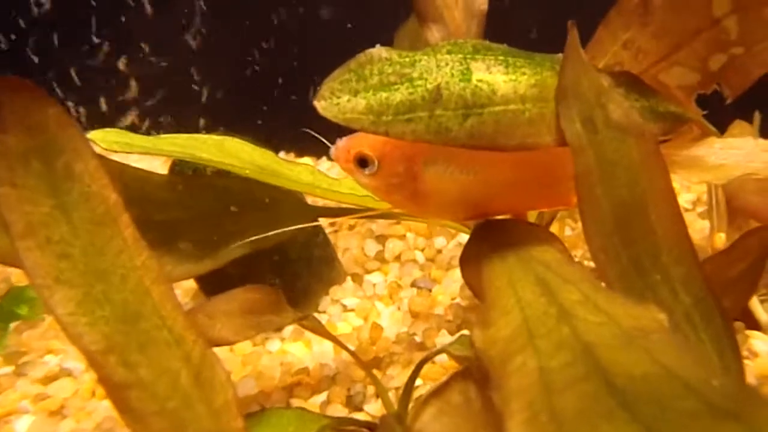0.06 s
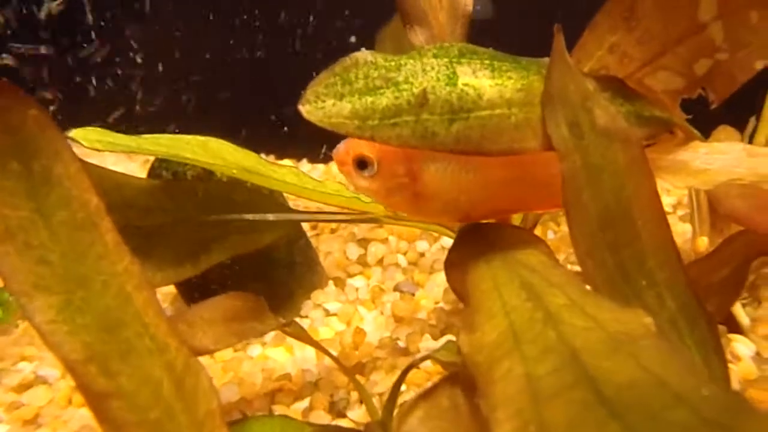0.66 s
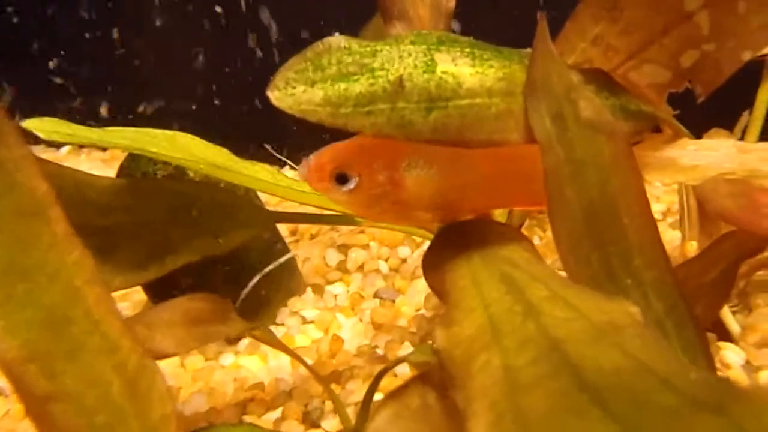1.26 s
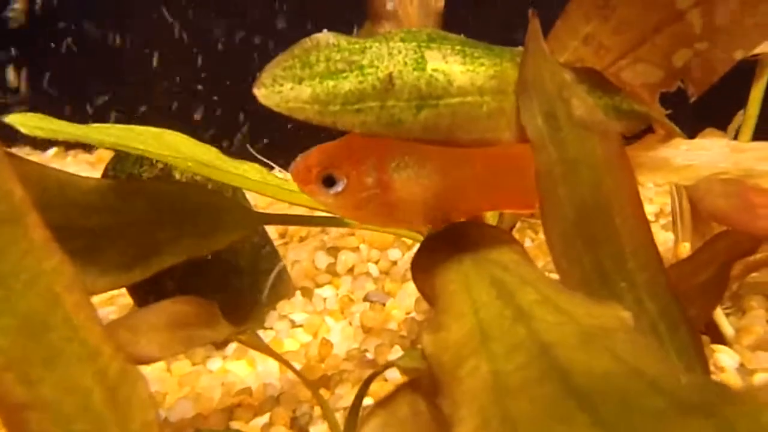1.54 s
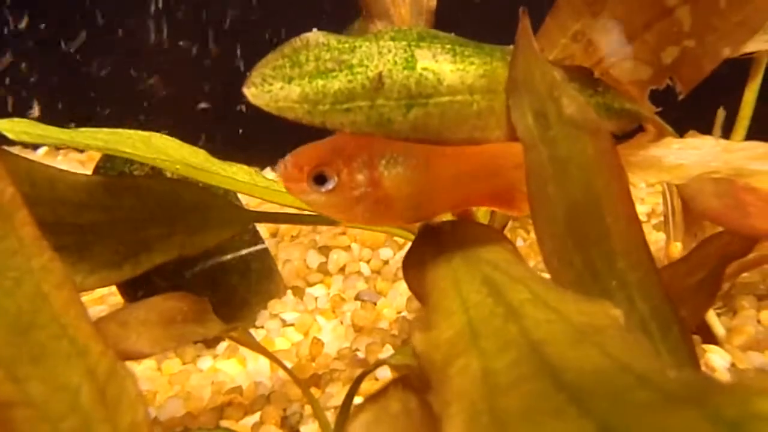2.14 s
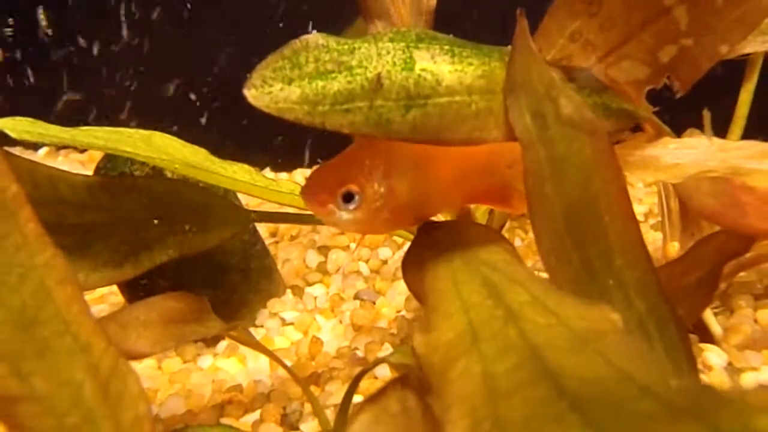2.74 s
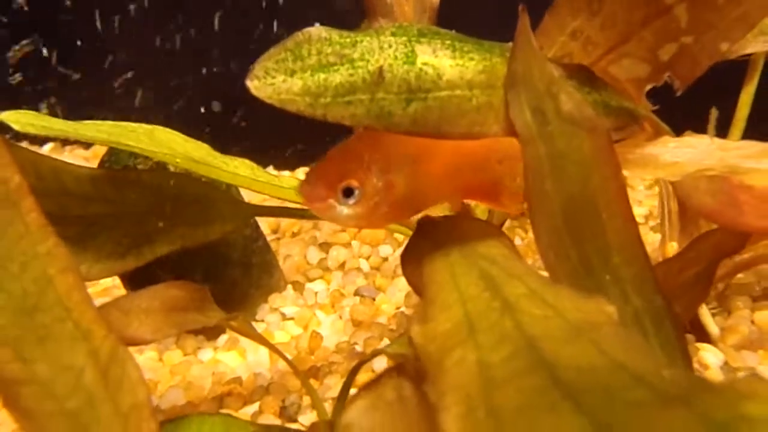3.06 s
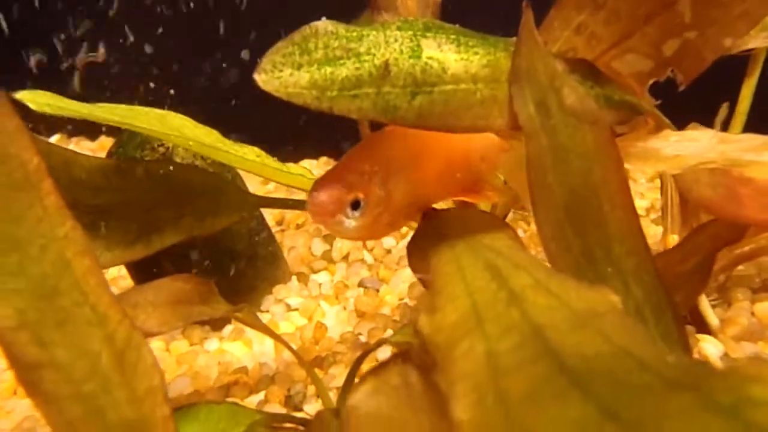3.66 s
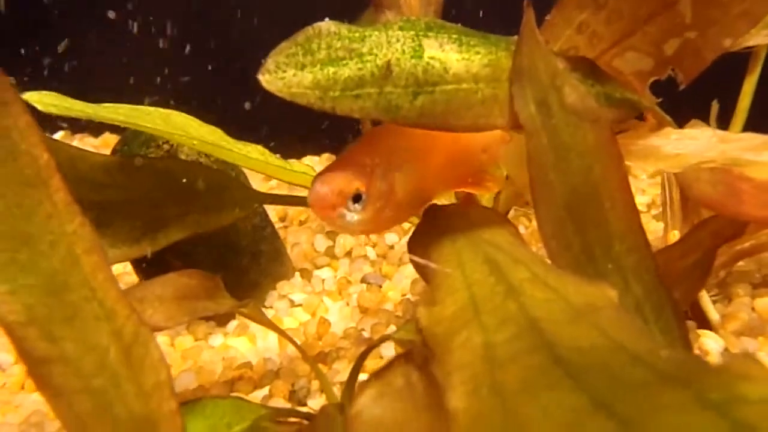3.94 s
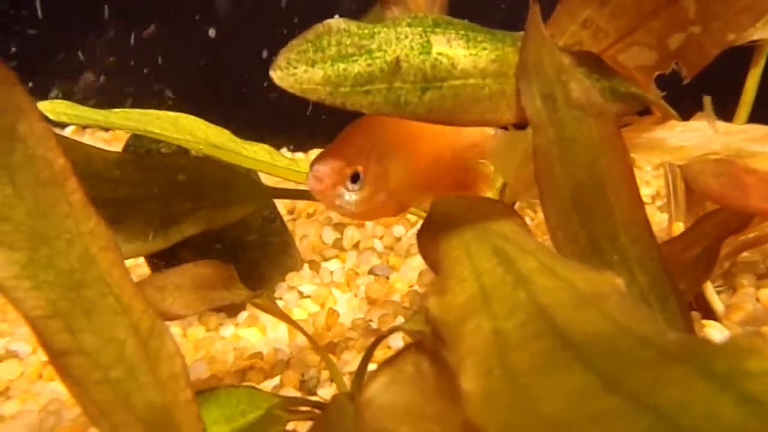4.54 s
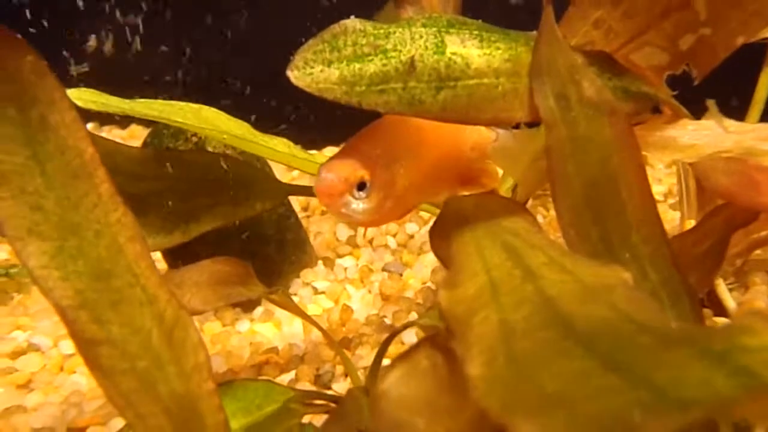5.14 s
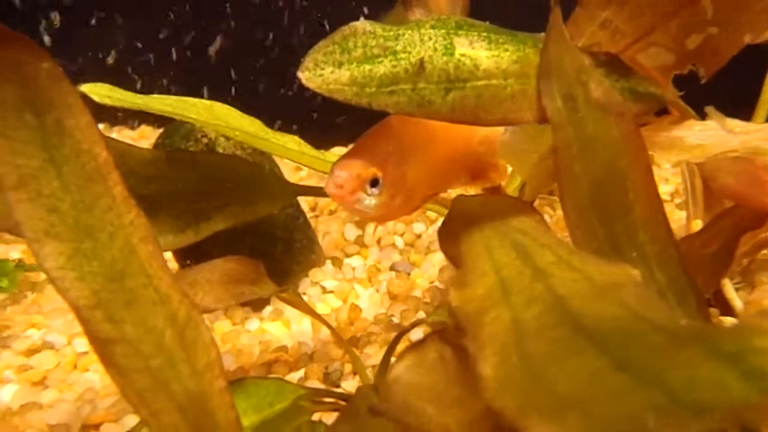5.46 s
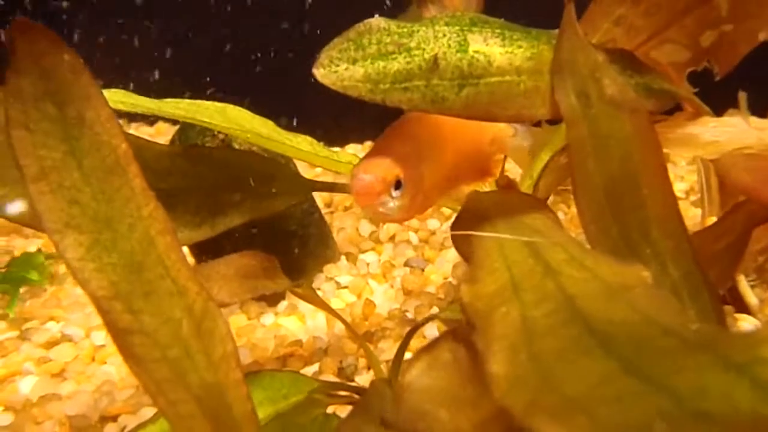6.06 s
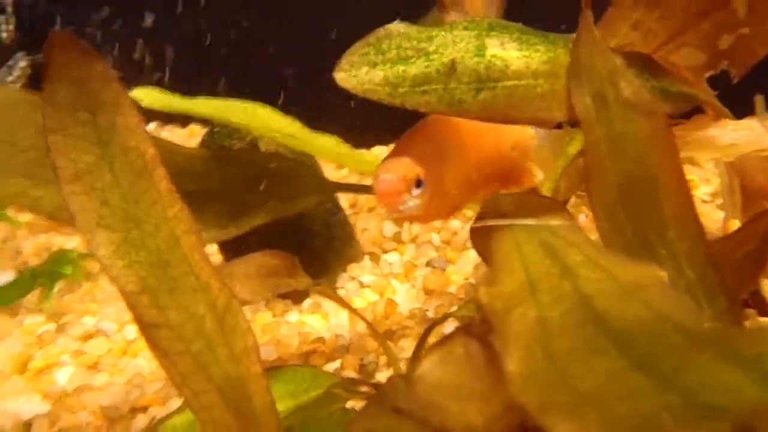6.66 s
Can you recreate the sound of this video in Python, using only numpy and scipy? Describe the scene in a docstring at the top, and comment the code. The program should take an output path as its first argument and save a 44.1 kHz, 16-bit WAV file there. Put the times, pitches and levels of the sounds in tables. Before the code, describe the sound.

Close, irregular bubbling and gurgling of water in a fish tank, with an air pump humming steadily underneath.

```python
"""Bubbles plop and babble over the hum of an air pump: an aquarium, heard close to the glass.
Each plop rings at its own pitch and sets the tank and the air pocket under its lid ringing.
Around the plops churn small bubbles, low gulps of air, a wash of water and a fine fizz.
The pump hums at twice the mains frequency; faint dry ticks and a thin electrical whine lie on top.
Gain control ducks everything after the loud plops."""
import sys
import numpy as np
from scipy import signal
from scipy.fft import rfft, irfft
from scipy.io import wavfile
from scipy.ndimage import uniform_filter1d

SR = 44100
rng = np.random.default_rng(int(sys.argv[2]) if len(sys.argv) > 2 else 0)


def persist_wave(psi):
    """Save psi, clipped to +-1, as 16-bit WAV."""
    counts = np.round(np.clip(psi, -1, 1) * 32767).astype(np.int16)
    wavfile.write(sys.argv[1], SR, np.atleast_2d(counts).T)


N = 299439
TIME = np.arange(N) / SR
LEAD_S = .006
AGE = np.arange(SR // 5) / SR - LEAD_S  # clock of every short sound, starting just ahead of its onset

# the clearest bubbles: t/s, level/dB, f/Hz, t60/s, swell/s, push on the tank/dB, click/dB
PLOPS = [(0.0107, -25, 764.0, 0.062, 0.0003, -49, -42), (0.0393, -24.5, 830, 0.023, 0.00042, -20.5, -33),
         (0.1096, -29, 872, 0.066, 0.00028, -18.5, -62), (0.224, -26.0, 700, 0.05, 0.00079, -39, -38),
         (0.2849, -54, 1190, 0.22, 0.00035, -25.5, -36), (0.3048, -25.5, 700, 0.03, 0.0005, -44, -42),
         (0.3956, -14.5, 651, 0.2, 0.0021, -9.5, -9.5), (0.4578, -17, 652, 0.087, 0.0016, -21.5, -27),
         (0.7264, -21, 777, 0.035, 0.0011, -45, -40), (0.7705, -22.5, 784, 0.097, 0.0014, -54, -43.0),
         (0.8073, -31, 764.0, 0.05, 0.0012, -40, -47), (0.8748, -13.5, 783, 0.015, 0.0011, -22.5, -33),
         (1.0728, -29, 786.0, 0.054, 0.00075, -48, -44), (1.162, -26, 794, 0.096, 0.00092, -42.0, -50.5),
         (1.1734, -24, 773, 0.071, 0.0019, -43, -47), (1.2418, -10, 778, 0.095, 0.0015, -52, -14),
         (1.351, -17, 780, 0.072, 0.00047, -35, -29.5), (1.3765, -24.5, 805, 0.22, 0.0003, -52, -55.0),
         (1.394, -28.5, 796, 0.074, 0.00081, -41, -49), (1.4835, -20.5, 790, 0.11, 0.0007, -37, -29.0),
         (1.5402, -6, 785, 0.076, 0.00078, -55, -9), (1.5999, -31, 844, 0.081, 0.0029, -20.5, -34),
         (1.6996, -31, 658, 0.023, 0.0008, -25, -33), (1.7821, -34, 1094, 0.1, 0.0029, -15.5, -34),
         (1.8421, -31.5, 802, 0.54, 0.0014, -29, -49), (1.8956, -32.5, 785, 0.074, 0.0027, -30, -42),
         (1.9308, -32, 852, 0.22, 0.0025, -15.5, -43), (1.9628, -23.5, 769, 0.14, 0.00082, -17.5, -36.0),
         (1.9916, -16.5, 780, 0.042, 0.00087, -35, -33), (2.1326, -37, 1108, 0.13, 0.0032, -14.5, -40),
         (2.2237, -23, 766, 0.088, 0.0022, -19, -31), (2.3312, -18, 768.0, 0.12, 0.00064, -31, -30),
         (2.3629, -31, 773, 0.086, 0.00062, -44, -38), (2.3999, -23.0, 779, 0.21, 0.0013, -44, -45),
         (2.4274, -24, 800, 0.058, 0.00058, -39.0, -44), (2.4605, -22.5, 793, 0.13, 0.0036, -32, -70),
         (2.5064, -15.5, 766, 0.08, 0.00042, -47, -33), (2.5476, -29.0, 994.0, 0.057, 0.00047, -19, -63),
         (2.584, -29, 734, 0.19, 0.00032, -34, -31), (2.6427, -27, 746, 0.057, 0.00057, -33, -39),
         (2.6532, -36, 1070, 0.081, 0.0015, -19.5, -41), (2.7012, -32.5, 786, 0.024, 0.0031, -24, -43),
         (2.7836, -23.0, 755, 0.23, 0.00045, -49, -45), (2.7998, -19.5, 848, 0.1, 0.0014, -17.5, -46),
         (2.8605, -21, 850, 0.045, 0.0016, -45, -50.0), (2.8725, -12.5, 794, 0.084, 0.00092, -30, -31),
         (2.8734, -24.5, 930, 0.14, 0.0011, -40, -50), (2.9069, -19, 815, 0.11, 0.00043, -26, -43),
         (2.9423, -25, 853, 0.05, 0.0008, -22.5, -53), (2.9947, -17, 962, 0.03, 0.0011, -13.5, -68),
         (3.0204, -26, 765, 0.04, 0.0024, -23.5, -46.0), (3.065, -29, 763, 0.08, 0.0008, -39, -44),
         (3.0835, -43, 920, 0.063, 0.00058, -24, -37), (3.2162, -41, 1052.0, 0.23, 0.001, -20, -46),
         (3.2887, -30, 886, 0.074, 0.00035, -26, -32), (3.3304, -46, 790, 0.24, 0.00034, -23.5, -40),
         (3.3884, -30, 590, 0.021, 0.00069, -26.5, -38), (3.4501, -36, 1040, 0.097, 0.001, -25, -37),
         (3.4799, -40, 750, 0.042, 0.00083, -39.0, -41), (3.4989, -33, 774, 0.041, 0.00053, -36, -44),
         (3.5475, -20, 795, 0.04, 0.00063, -30.0, -42), (3.5567, -19, 839, 0.092, 0.0012, -14.0, -23.5),
         (3.5891, -19.5, 793, 0.056, 0.00055, -23.5, -46.0), (3.6163, -16, 784, 0.11, 0.0013, -20, -64),
         (3.638, -25.5, 649, 0.43, 0.0026, -24, -44), (3.6628, -16, 824, 0.14, 0.0011, -11, -19.5),
         (3.6823, -25, 660, 0.22, 0.0038, -34, -50), (3.722, -27.5, 651, 0.15, 0.0017, -44, -50.0),
         (3.766, -29.5, 695, 0.089, 0.0018, -44, -46), (3.8385, -18.5, 670, 0.098, 0.00031, -24, -35),
         (3.9026, -27.5, 676, 0.072, 0.0009, -32, -48), (3.9267, -25, 673, 0.12, 0.00058, -26, -57),
         (3.993, -31, 666, 0.055, 0.0019, -49, -48.0), (4.0267, -15, 737, 0.023, 0.00077, -38, -38),
         (4.0616, -29, 750, 0.05, 0.00077, -33, -37), (4.0752, -16, 772, 0.041, 0.00094, -36, -29),
         (4.1257, -16.5, 810, 0.081, 0.0019, -25, -44), (4.2023, -22.5, 870, 0.049, 0.0012, -11, -31),
         (4.2212, -31, 802, 0.04, 0.00079, -45, -39.0), (4.2514, -33, 910, 0.036, 0.00053, -24.5, -57),
         (4.278, -28, 1050, 0.076, 0.0011, -14.5, -45), (4.3593, -27, 1023, 0.049, 0.00075, -22, -55),
         (4.3781, -31, 700, 0.042, 0.00094, -36, -54), (4.4151, -26.5, 690, 0.1, 0.00043, -41, -47),
         (4.4423, -21, 900, 0.02, 0.00078, -14.5, -17.5), (4.4922, -24.5, 770, 0.043, 0.00092, -42, -45),
         (4.5529, -12, 783, 0.036, 0.00038, -15, -11), (4.699, -17.5, 750, 0.018, 0.00053, -49, -35),
         (4.7329, -34, 735, 0.036, 0.00078, -41, -38), (4.7472, -37.5, 781, 0.38, 0.00044, -26, -34),
         (4.7808, -30, 760, 0.086, 0.0012, -41, -38), (4.8793, -33, 780, 0.05, 0.0009, -39.0, -31),
         (4.9374, -24.5, 770, 0.04, 0.00042, -32, -43), (4.9515, -24.5, 930, 0.06, 0.00041, -19, -28),
         (5.1028, -23.5, 714, 0.05, 0.0014, -42, -39), (5.2291, -29, 750, 0.048, 0.001, -40, -35),
         (5.257, -30, 717, 0.082, 0.0009, -33, -38), (5.3122, -24, 754, 0.085, 0.00068, -41, -41),
         (5.3227, -30, 725, 0.025, 0.0023, -28, -41), (5.5309, -25, 700, 0.015, 0.00057, -41, -44),
         (5.598, -21, 675, 0.038, 0.00044, -55, -48), (5.6381, -11.5, 795, 0.016, 0.00087, -17.5, -14.5),
         (5.7014, -20, 667, 0.058, 0.00046, -36, -33), (5.7768, -27, 750, 0.044, 0.00079, -37, -36),
         (5.9153, -28.5, 795, 0.26, 0.0013, -35, -41), (6.0722, -26.0, 778, 0.07, 0.00058, -37, -45),
         (6.1017, -21, 771, 0.071, 0.0014, -48, -71), (6.2501, -31, 745, 0.058, 0.00064, -39, -43),
         (6.265, -21.5, 840, 0.072, 0.0021, -13.5, -20.5), (6.2812, -33, 695, 0.064, 0.0013, -43.5, -35),
         (6.3278, -33, 668, 0.1, 0.0004, -24, -31.5), (6.3457, -7.5, 767, 0.084, 0.0012, -35, -16.5),
         (6.3973, -21.5, 784, 0.054, 0.0023, -23.5, -33), (6.5708, -28.5, 785, 0.029, 0.0007, -44, -38),
         (6.6048, -20.5, 800, 0.042, 0.0015, -48, -44)]
# pitch of the air pocket under the lid, wandering as it grows and shrinks: t/s, f/Hz
POCKET_PITCH = [(0, 734), (.4, 751), (.55, 696), (.8, 769), (1.05, 759), (1.4, 778), (1.7, 729), (2.2, 762),
                (2.65, 735), (3.0, 746.5), (3.2, 732), (3.6, 741), (3.88, 799), (4.05, 751), (4.2, 749.6),
                (4.35, 724), (4.85, 766), (5.1, 708), (5.35, 740), (5.65, 662), (5.95, 789), (6.27, 744),
                (6.5, 781)]


def plops(bubble_db=-0.35, tank_db=-0.1, click_trim_db=-2.0):
    """Each bubble swells and rings at its own pitch and pushes the tank; a click rides on its first crests."""
    out, pushes = np.zeros(N), np.zeros(N)
    for s, db, hz, t60, swell_s, push_db, click_db in PLOPS:
        tone = gain_of(db + bubble_db) * ring(hz, t60, swell_s)
        add(out, s, tone + gain_of(click_trim_db) * click(click_db, hz, t60))
        pushes[round(s * SR)] += gain_of(push_db + tank_db)
    return out + tank(pushes)


def click(db, hz, t60, soft_db=-34, hard_db=-15, dull_hz=380, bright_hz=690, spike_s=.00005):
    """Sharp clicks ride on the first crests of the loudest plops, brighter when harder, repeated on the first
    swings."""
    hardness = np.clip((db - soft_db) / (hard_db - soft_db), 0, 1)
    tone_hz = dull_hz + (bright_hz - dull_hz) * hardness
    peak = (1 / (1 - 2j * np.pi * tone_hz * AGE) ** 2).real
    swings_s = np.arange(4) / hz  # the first crests of the plop's tone
    spikes = sum(gain_of(-200 * s / t60) * np.exp(-abs(AGE - s) / spike_s) for s in swings_s)
    high_ring = ring(hz=2600, t60=0.13 * t60, rise_s=0.00018)
    return gain_of(db) * (peak + hardness * (gain_of(-13) * spikes + gain_of(-32) * high_ring))


def tank(pushes):
    """The glass box and the air pocket under its lid ring when pushed; the pocket's pitch wanders."""
    # modes of the glass box: f/Hz, level/dB, t60/s
    glass_modes = [(655, -21.5, 0.071), (826, -30.5, 0.099), (911, -23.5, 0.19), (437, -19.5, 0.015),
                   (301, -16, 0.072)]
    # the air pocket's quick ring and lingering tail: level/dB, t60/s
    pocket_decays = [(-2.5, 0.069), (-21.5, 0.2)]
    glide = np.exp(2j * np.pi * np.cumsum(follow(POCKET_PITCH)) / SR)
    fade = sum(gain_of(db) * ring(0, t60, rise_s=0.001) for db, t60 in pocket_decays)
    glass = sum(gain_of(db) * ring(hz, t60, rise_s=0.0012) for hz, db, t60 in glass_modes)
    on_time = slice(round(LEAD_S * SR), round(LEAD_S * SR) + N)
    pocket = (glide * signal.oaconvolve(pushes / glide, fade)[on_time]).real
    return pocket + signal.oaconvolve(pushes, glass)[on_time]


def pings(level_db=-3, cycles=66, within_s=0.0092, scatter_hz=130, spread_db=10, count=3):
    """A small bubble rings high, too light to move the tank, and splits into a few of similar pitch."""
    # small bubbles that stand out on their own: t/s, level/dB, f/Hz
    clear_pings = [(0.0313, -35, 1740), (0.3062, -35, 1170), (0.532, -49, 1690), (.604, -41.5, 1390),
                   (.657, -43.5, 1180), (0.703, -37.5, 1237), (1.026, -48, 1290), (1.359, -38, 1160),
                   (1.397, -35, 1176), (1.485, -32, 1143), (1.7747, -43.5, 4030), (1.81, -46, 1560),
                   (1.894, -40, 1360), (2.056, -41, 1430), (2.136, -41, 1570), (2.223, -43, 1560),
                   (2.296, -49.5, 1937), (2.365, -34.5, 1050), (3.084, -39, 1400), (3.233, -51.5, 3840),
                   (3.242, -35, 1180), (3.387, -43, 1530), (3.476, -44, 1100), (4.19, -56, 4000),
                   (4.207, -32, 1147), (4.209, -40, 1375), (4.695, -48.5, 1780), (4.748, -37.5, 1384),
                   (4.816, -52, 1220), (4.856, -40, 1180), (4.889, -43, 1378), (4.938, -43, 1400),
                   (5.037, -42, 1395), (5.099, -40.5, 1390), (5.102, -45, 1660), (5.177, -36.5, 1170),
                   (5.178, -45, 1426), (5.419, -57, 2380), (5.462, -38, 1087), (5.485, -47, 1550),
                   (5.533, -42, 1410), (5.598, -34.5, 1160), (5.778, -51, 1490), (5.938, -45.5, 1770),
                   (5.969, -39, 1120), (6.33, -50, 2480), (6.392, -34.5, 1310), (6.661, -54, 2454),
                   (6.721, -42, 1150)]
    out = np.zeros(N)
    for (s, db, hz), draws in zip(clear_pings, rng.random((len(clear_pings), count, 3))):
        t60 = cycles / hz
        add(out, s, gain_of(db + level_db) * ring(hz, t60))
        for delay, detune, weakness in draws:
            splinter = ring(hz + scatter_hz * (2 * detune - 1), t60 / 2)
            add(out, s + within_s * delay, gain_of(db + level_db - spread_db * weakness) * splinter)
    return echoes(out, level_db=-9.0, t60=0.059)


def shed_bubbles(below_db=17, spread_db=9, low_hz=890, high_hz=1450, db_per_octave=-15, within_s=0.021):
    """Each large bubble sheds six smaller ones, which ring higher along with it."""
    out = np.zeros(N)
    for (s, db, _, _, _, push_db, _), draws in zip(PLOPS, rng.random((len(PLOPS), 6, 3))):
        parent_db = min(max(db, push_db), -22)
        for delay, pitch, weakness in draws:
            hz = low_hz * (high_hz / low_hz) ** pitch
            level_db = parent_db - below_db + db_per_octave * np.log2(hz / low_hz) - spread_db * weakness
            add(out, s + within_s * delay, gain_of(level_db) * ring(hz, t60=0.018))
    return echoes(out, level_db=-20.5, t60=0.055)


def churn(swell_depth=0.79):
    """Soft plops near the air pocket's pitch and a babble of smaller bubbles swell with the air stream."""
    # swells of the air stream, each taken about its mean: t/s, soft plops/dB, high bubbles/dB
    air_stream = [(0.0, -42.5, -64.5), (0.62, -45, -57.5), (1.0, -40.5, -79), (1.321, -40, -58),
                  (2.7, -39.5, -62.5), (3.57, -32.5, -67.5), (3.84, -51, -62.5), (4.369, -38.5, -66),
                  (4.88, -36, -53), (5.13, -48, -66.5), (5.45, -38, -63), (5.94, -49, -60.5),
                  (6.18, -33.5, -66), (6.79, -36.5, -58)]
    soft = swarm(per_s=26, low_hz=.975 * follow(POCKET_PITCH), octaves=.11, level_db=-28.5,
                 spread_db=8.5, db_per_octave=4.5, cycles=57, tank_share=0.16)
    small = swarm(per_s=70, low_hz=849, octaves=.52, level_db=-42.5,
                  spread_db=14.5, db_per_octave=-17, cycles=92, tank_share=0.18)
    smaller = swarm(per_s=120, low_hz=1092, octaves=.7, level_db=-47,
                    spread_db=19, db_per_octave=-13.5, cycles=29, tank_share=0.6)
    tiny = swarm(per_s=25, low_hz=1700, octaves=1.5, level_db=-62,
                 spread_db=9, db_per_octave=-3, cycles=35, tank_share=0)
    low = soft + echoes(small, level_db=-7.5, t60=0.063)
    high = echoes(smaller + tiny, level_db=-0.5, t60=0.047)
    s, low_db, high_db = np.transpose(air_stream)
    low_swell = gain_of(swell_depth * np.interp(TIME, s, low_db - low_db.mean()))
    high_swell = gain_of(swell_depth * np.interp(TIME, s, high_db - high_db.mean()))
    return low_swell * low + high_swell * high


def swarm(per_s, low_hz, octaves, level_db, spread_db, db_per_octave, cycles, tank_share):
    """Loosely spaced bubbles ring from low_hz (steady or moving) upwards; higher ones die sooner."""
    out, pushes = np.zeros(N), np.zeros(N)
    lowest_hz = low_hz * np.ones(N)
    for k, (late, pitch, weakness, sustain) in enumerate(rng.random((int(per_s * N / SR), 4))):
        s = (k + late) / per_s
        hz = lowest_hz[int(s * SR)] * 2 ** (octaves * pitch)
        height = gain_of(level_db + db_per_octave * octaves * pitch - spread_db * np.sqrt(weakness))
        t60 = cycles / hz * (.5 + sustain)
        add(out, s, height * ring(hz, t60, rise_s=1 / hz, size=int((LEAD_S + t60) * SR)))
        pushes[int(s * SR)] += height * tank_share
    return out + tank(pushes) if tank_share else out


def gulps(level_db=-1, delay_s=0.00354):
    """Large pockets of air break from the outlet with a short low knock."""
    # heavy gulps that shake the water: t/s, level/dB, f/Hz, t60/s
    knocks = [(0.048, -21, 147, 0.031), (0.101, -13.5, 333, 0.0077), (.233, -16.5, 436, 0.011),
              (0.577, -23, 287, 0.028), (.698, -21, 314, 0.02), (1.153, -26, 151, 0.03),
              (1.238, -17.5, 465, 0.017), (1.35, -28, 151, 0.026), (1.646, -14, 337, 0.0047),
              (1.777, -17, 287, .021), (2.146, -23, 291, .04), (2.332, -22, 293, 0.078),
              (2.564, -14.5, 325, 0.024), (2.65, -24.5, 307, 0.09), (2.916, -13, 350, 0.0039),
              (3.287, -22.5, 299, 0.079), (3.538, -30, 288, 0.037), (4.198, -22.5, 288, 0.035),
              (4.437, -15.5, 286, .032), (4.744, -28, 310, 0.073), (5.055, -26, 296, 0.089),
              (5.219, -26.5, 183, .099), (5.281, -23.5, 183, .066), (6.665, -17, 343, 0.022)]
    out = np.zeros(N)
    for s, db, hz, t60 in knocks:
        add(out, s + delay_s, gain_of(db + level_db) * ring(hz, t60, rise_s=0.00044))
    return out


def pump(mains_hz=49.988, flutter_db=1.06):
    """The diaphragm is pulled twice in each mains cycle; its strength wavers a little."""
    # partials of the hum: multiple of the mains frequency, level/dB
    partials = [(1, -52.5), (2, -32), (3, -82.5), (4, -56.5), (6, -49)]
    hum = sum(gain_of(db) * np.cos(2 * np.pi * (round(k) * mains_hz * TIME + rng.random()))
              for k, db in partials)
    return np.sqrt(2) * hum * gain_of(flutter_db * drift(rate_hz=27))


def water(wash_db=-39.5, stir_db=-46, surge_db=2.1, fizz_db=-0.53, flicker_db=2.5):
    """A restless wash of moving water keeps the tank faintly ringing; the finest bubbles fizz."""
    # colour of the wash: f/Hz, level/dB
    wash_colour = [(20, -16.5), (32, -2), (75, -10), (140, -1.5), (230, 1.5), (292, 8), (350, -1),
                   (415, 4.5), (480, -8.5), (530, -4), (640, -2), (742, -12.5), (900, -15.5), (1020, -25),
                   (1200, -38.5), (2200, -49.5)]
    # colour of the fizz: f/Hz, level/dB
    fizz_colour = [(500, 6.5), (1800, 2), (2800, -0.5), (3500, -2), (4100, -0.5), (4580, 3), (5200, -3.5),
                   (6000, -5.5), (7500, -7.5), (9900, -11), (10500, -14)]
    # slow rise and fall of the fizz: t/s, level/dB
    fizz_swell = [(0.0, -63.5), (0.34, -63.5), (2.55, -58), (2.99, -62), (3.27, -59), (4.23, -62),
                  (6.49, -63.5), (6.79, -68.5)]
    surge = gain_of(surge_db * drift(rate_hz=22))
    wash = gain_of(wash_db) * noise(wash_colour)
    stirred_tank = gain_of(stir_db) * unit_rms(tank(rng.standard_normal(N)))
    fizz = noise(fizz_colour) * gain_of(follow(fizz_swell) + fizz_db + flicker_db * drift(rate_hz=90))
    return (wash + stirred_tank) * surge + fizz


def ticks(sharp_db=0.7, weak_db=-36, spread_db=9, beat_hz=86.13, longest_gap=8, dull_hz=8000):
    """Dry ticks of either polarity: sharp ones, and weaker ones every few beats of a fast, even pulse."""
    # the sharpest ticks: t/s, level/dB
    sharp_ticks = [(0.0326, -29), (0.0558, -20), (0.1024, -32), (0.1256, -31.0), (0.184, -33.5),
                   (0.2069, -31), (0.2534, -21.5), (0.358, -32.5), (0.439, -29), (0.4739, -28.5),
                   (0.5087, -31), (0.5668, -27), (0.6829, -29), (0.7641, -32), (0.8918, -30.5),
                   (0.927, -32.0), (1.0893, -35), (1.1124, -28.5), (1.1355, -29.5), (1.1822, -28.0),
                   (1.1937, -28.5), (1.3678, -33), (1.4143, -30.5), (1.449, -31.5), (1.4723, -30.5),
                   (1.495, -31.5), (1.5897, -29), (1.6929, -36), (1.7278, -30), (1.7972, -31),
                   (1.8323, -36), (1.8671, -31), (1.9483, -27.5), (1.9718, -29.5), (2.007, -34),
                   (2.0882, -29), (2.1225, -29.5), (2.1918, -29.5), (2.2384, -25), (2.3081, -32.0),
                   (2.3196, -29), (2.3432, -27), (2.4477, -29.5), (2.4819, -33), (2.6218, -27.5),
                   (2.6681, -41), (2.6913, -33), (2.7147, -31), (2.8075, -26.5), (2.8887, -29),
                   (2.912, -33.0), (2.9584, -34), (3.0047, -22.5), (3.074, -33), (3.0978, -31.5),
                   (3.1675, -30), (3.214, -31.5), (3.2371, -35), (3.306, -30), (3.365, -30), (3.388, -28),
                   (3.4343, -39), (3.527, -32), (3.609, -33.5), (3.713, -30), (3.7247, -33.5), (3.748, -25),
                   (3.8175, -30.0), (3.8293, -30.5), (3.9684, -32), (4.0381, -26.5), (4.1078, -33.0),
                   (4.1543, -31), (4.2933, -37), (4.5028, -33.5), (4.5838, -30), (4.5954, -30),
                   (4.7694, -34.5), (4.8741, -31.5), (4.9088, -32.5), (4.9555, -32.5), (4.9785, -32),
                   (5.0944, -31.5), (5.1642, -34), (5.234, -31.5), (5.3274, -31.5), (5.3383, -31.0),
                   (5.408, -32.0), (5.501, -33), (5.525, -42), (5.6287, -31), (5.6751, -27.5), (5.71, -32),
                   (5.768, -34.5), (5.8145, -32.5), (5.8377, -30.5), (5.9539, -31.5), (6.0235, -37),
                   (6.1628, -35), (6.209, -29), (6.2324, -33.5), (6.2902, -30), (6.314, -28), (6.3835, -28),
                   (6.418, -27.5), (6.4652, -31.5), (6.4878, -31.5), (6.5342, -24), (6.5691, -27.5),
                   (6.6156, -29.5), (6.6852, -30), (6.7549, -29.5)]
    out = np.zeros(N)
    edge = .5 * np.sign(AGE) * np.exp(-abs(AGE) / 0.00059)  # a sudden step that relaxes
    for s, db in sharp_ticks:
        add(out, s, rng.choice([-1, 1]) * gain_of(db + sharp_db) * edge)
    gap, weakness, polarity = rng.random((int(beat_hz * N / SR), 3)).T
    times = sharp_ticks[0][0] + np.cumsum(1 + np.floor(longest_gap * gap)) / beat_hz
    heights = np.sign(polarity - .5) * gain_of(weak_db - spread_db * weakness)
    for s, height in zip(times, heights):
        add(out, s, height * edge)
    return smooth(out, lag_s=1 / (2 * np.pi * dull_hz))


def whine():
    """Thin electrical tones, each chopped into a cluster of evenly spaced lines."""
    # clusters of the whine: centre/Hz, line spacing/Hz, width/Hz
    clusters = [(8181.8, 60.6, 45), (4667, 30.3, 170)]
    # strength of each cluster: level/dB
    cluster_levels = [-79.5, -80]
    out = np.zeros(N)
    for (centre, spacing, width), db in zip(clusters, cluster_levels):
        offsets_hz = spacing * (np.arange(-6, 6) + .5)
        lines = sum(np.cos(2 * np.pi * ((centre + hz) * TIME + rng.random())) / (1 + (hz / width) ** 2)
                    for hz in offsets_hz)
        out += gain_of(db) * unit_rms(lines)
    return out


def echoes(x, level_db, t60, size=3000):
    """Sound bounces between the water, the lid and the glass: a short, dense tail."""
    t = np.arange(size) / SR
    taps = rng.standard_normal(size) * (t > .003) * gain_of(-60 * t / t60)
    return x + gain_of(level_db) * signal.oaconvolve(x, taps / np.linalg.norm(taps))[:N]


def ring(hz, t60, rise_s=.0009, size=None):
    """A tone that swells quickly and dies away."""
    age = AGE[:size]
    swell = .5 + .5 * np.tanh(age / rise_s + 1.6)
    return swell * gain_of(-60 * age / t60) * np.cos(2 * np.pi * hz * age)


def noise(points):
    """Steady noise of rms 1, coloured by points of f/Hz, level/dB."""
    hz, db = np.transpose(points)
    colour = gain_of(np.interp(np.log(np.fft.rfftfreq(N, 1 / SR) + 1), np.log(hz), db))
    return unit_rms(irfft(rfft(rng.standard_normal(N)) * colour, N))


def drift(rate_hz):
    """A random wander of rms 1, mostly slower than the given rate."""
    hz = np.fft.rfftfreq(N, 1 / SR)
    return unit_rms(irfft(rfft(rng.standard_normal(N)) * np.exp(-(hz / rate_hz) ** 2), N))


def add(mix, s, sound):
    """Mixes in a sound that follows AGE, so that age zero falls on time s."""
    start = round((s - LEAD_S) * SR)
    sound = sound[max(-start, 0):]
    part = mix[max(start, 0):][:len(sound)]
    part += sound[:len(part)]


def follow(curve):
    """A curve of t/s, value points, read at every sample."""
    return np.interp(TIME, *np.transpose(curve))


def smooth(x, lag_s):
    """One-pole low-pass."""
    pole = np.exp(-1 / (lag_s * SR))
    return signal.lfilter([1 - pole], [1, -pole], x)


def gain_of(db):
    """Decibels to amplitude."""
    return 10 ** (np.asarray(db) / 20)


def unit_rms(x):
    """Scales to an rms of 1."""
    return x / np.sqrt(np.mean(x ** 2) + 1e-20)


def scene():
    """Bubbles, water, pump, ticks and whine meet in mono, close to the tank."""
    bubbles = echoes(plops(), level_db=-16.5, t60=0.022) + pings() + shed_bubbles() + churn() + gulps()
    return (bubbles + water() + pump() + ticks() + whine())[None]


def record(dry, threshold_db=-22, squeeze=0.54, recovery_db_per_s=75, ceiling=.56, cutoff_hz=10120):
    """Gain control dips after each loud plop and recovers; peaks are rounded off and the top is cut."""
    power_db = 10 * np.log10(abs(uniform_filter1d(dry[0] ** 2, size=441)) + 1e-12)
    fall_db = TIME * recovery_db_per_s
    held_db = np.maximum.accumulate(power_db + fall_db) - fall_db  # each peak is held and sinks steadily
    over_db = np.maximum(held_db - threshold_db, 0)
    ducked = dry / gain_of(squeeze * smooth(over_db, lag_s=0.014))
    rounded = ducked / (1 + (ducked / ceiling) ** 8) ** (1 / 8)
    low_pass = signal.firwin(201, cutoff_hz, window=("kaiser", 9), fs=SR)
    return signal.oaconvolve(rounded, low_pass[None], "same")


dry = scene()
out = record(dry)
persist_wave(out)
```